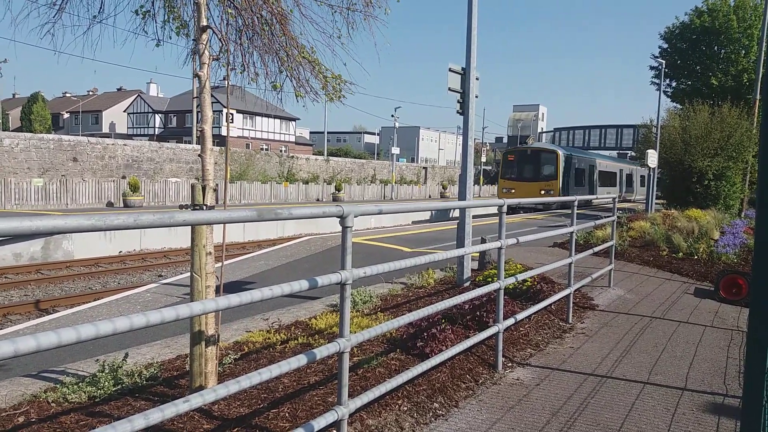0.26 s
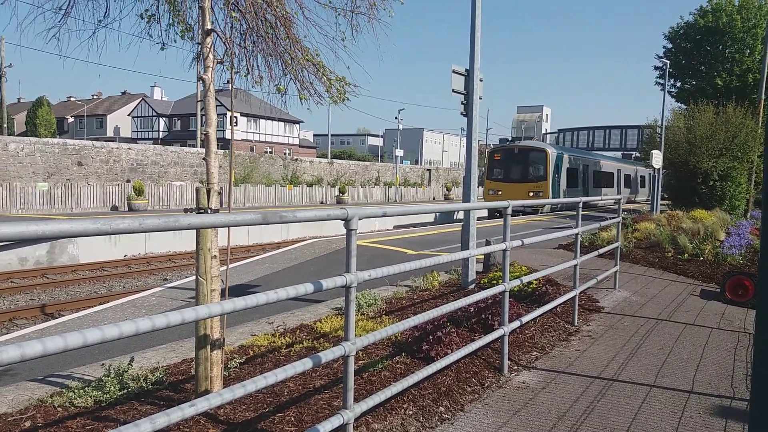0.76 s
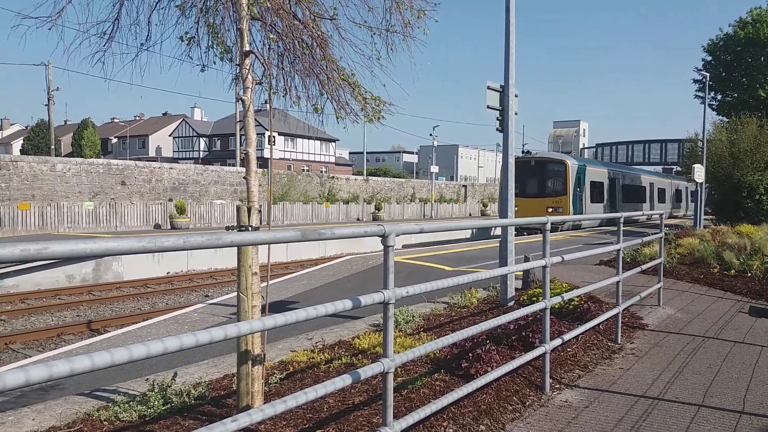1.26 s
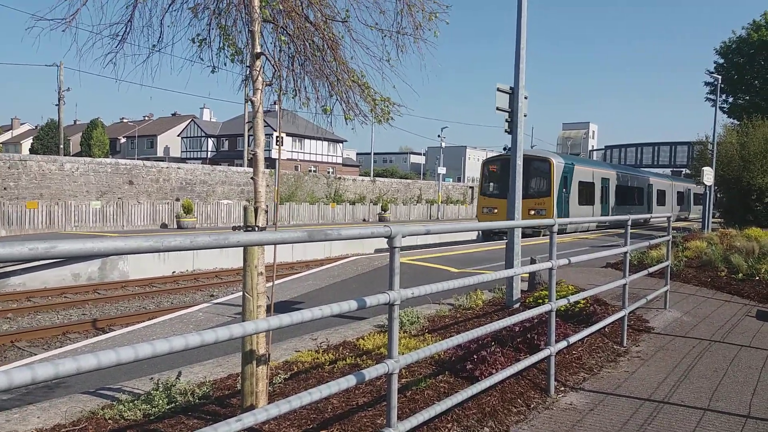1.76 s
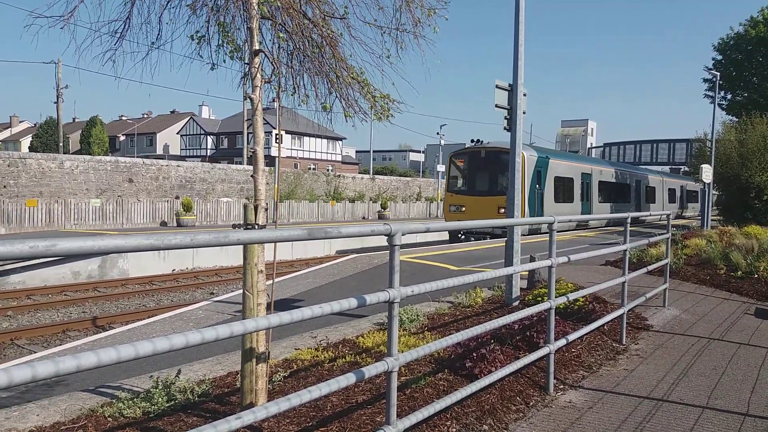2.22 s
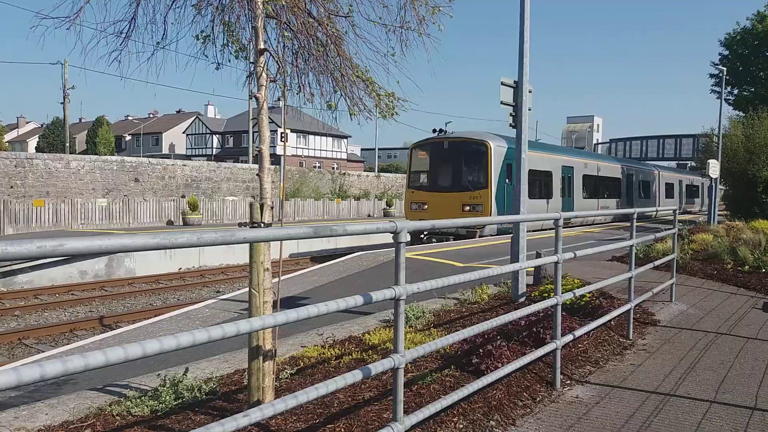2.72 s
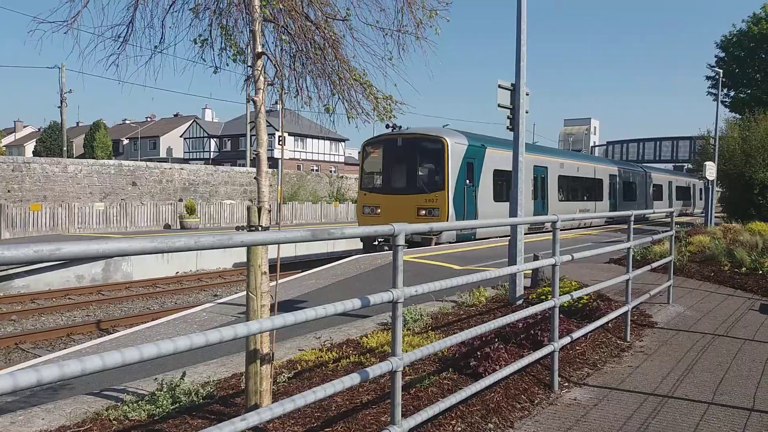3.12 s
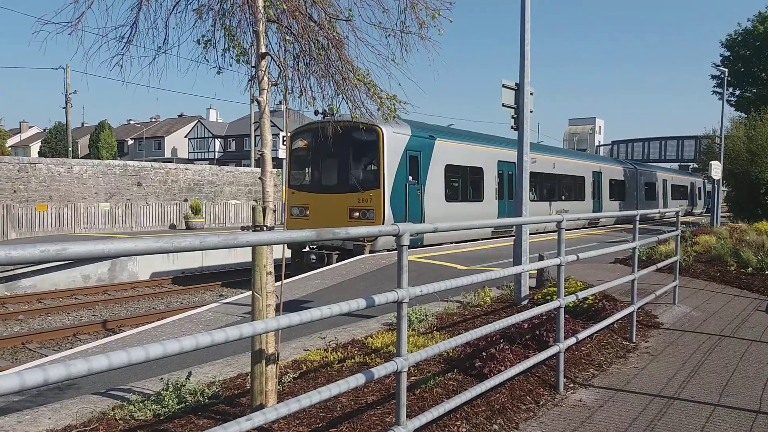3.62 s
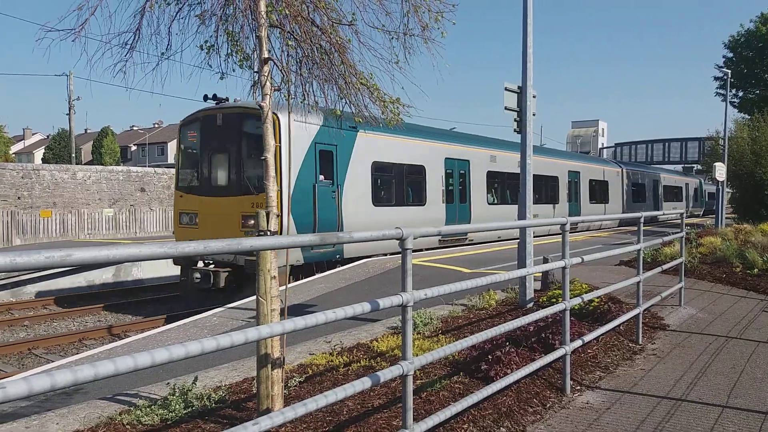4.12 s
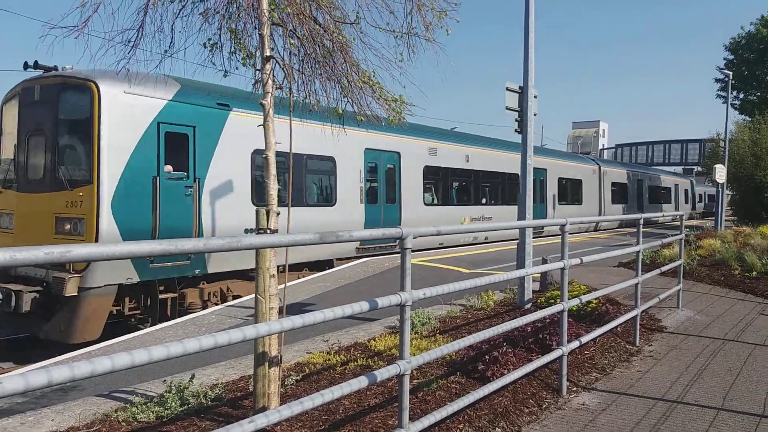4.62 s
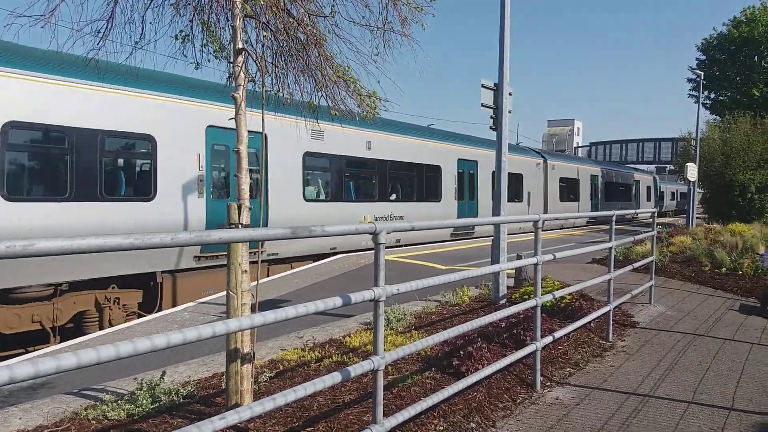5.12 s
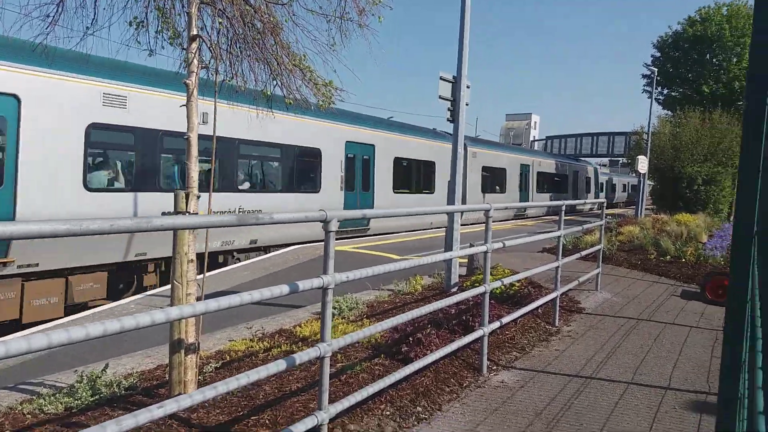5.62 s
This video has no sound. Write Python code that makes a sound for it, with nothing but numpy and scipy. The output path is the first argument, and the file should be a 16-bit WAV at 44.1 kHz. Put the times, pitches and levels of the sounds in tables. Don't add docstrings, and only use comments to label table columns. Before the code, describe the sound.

Low throbbing diesel drone and hiss swell as a railcar rolls close by, with dull rail knocks, a short air burst and singing wheels.

```python
import sys
import numpy as np
from scipy import signal
from scipy.io import wavfile
from scipy.ndimage import uniform_filter1d, map_coordinates

SR = 44100
rng = np.random.default_rng(int(sys.argv[2]) if len(sys.argv) > 2 else 0)


def attenuation_scalar(level_db):
    decades = np.asarray(level_db, float) / 20
    return 10 ** decades


def inscribe(sig):
    pcm = np.round(np.clip(np.atleast_2d(sig).T, -1, 1) * 32767)
    wavfile.write(sys.argv[1], SR, pcm.astype(np.int16))


N = 258867

# t/s, wheel gain/dB, fan gain/dB
APPROACH = [(0.0, 0, 1), (0.4, 0, -.5), (1.4, 1, 1.5), (2.05, 3.5, 0.5), (2.6, 5, 4.5), (3.1, 6.5, 3),
            (3.35, 6, 6.5), (3.7, 8, 6.5), (4.5, 9.5, 6), (4.9, 10, 4), (5.3, 13.5, 6), (5.87, 18, 12)]
# start t/s, length/s, f/Hz, width/Hz, level/dB (rms)
ECHO_BANDS = [(-.3, .9, 4050, 300, -43), (1.2, .65, 4750, 180, -47), (1.0, .7, 3750, 300, -47),
              (2.1, 1.0, 4350, 200, -44), (2.3, 1.2, 3900, 200, -46), (2.95, .8, 1690, 90, -37),
              (3.3, .85, 1600, 250, -36), (3.5, 1.1, 1820, 320, -34), (2.5, .9, 1110, 50, -43),
              (3.6, .5, 1110, 30, -43), (5.7, .33, 1465, 14, -29), (5.5, .25, 1530, 25, -31),
              (5.4, .25, 1635, 15, -33), (5.7, .3, 630, 30, -34), (2.4, 1.4, 8950, 80, -68),
              (3.1, 1.0, 2620, 120, -44), (2.2, .7, 2720, 120, -46), (1.1, .5, 750, 20, -47),
              (1.7, .7, 795, 60, -45), (2.1, .4, 560, 15, -45), (5.55, .32, 815, 90, -36),
              (4.05, .2, 120, 25, -29), (-.1, .45, 150, 70, -36), (5.55, .3, 210, 8, -29)]
# t/s, peak level/dB, f/Hz, time to fall 60 dB/s
JOINT_KNOCKS = [(3.1, -18, 89, 0.12), (2.2, -21, 200, 0.065), (0.708, -20, 300, 0.028),
                (0.4, -20, 180, 0.046), (4.5, -19, 270, 0.024), (3.924, -8.5, 260, 0.018),
                (3.926, -17, 480, .025), (4.166, -11, 210, 0.018), (5.48, -13, 309, 0.042),
                (5.26, -34, 10540, .006), (.2, -52, 10200, .03), (5.336, -47, 9940, .08),
                (5.35, -43, 10140, .08)]
# f/Hz, level/dB per Hz
FAN_HISS_FAR = [(1180, -60), (2000, -8), (2350, 2.5), (2730, -2), (2970, -0.5), (3210, -2), (4080, 1),
                (4890, -8), (5150, -11.5), (6220, -11), (7780, -31), (9000, -28), (11200, -28),
                (13300, -26), (15600, -47)]
FAN_HISS_NEAR = [(1180, -62), (2000, 1), (2380, -11.5), (2570, -6.5), (2920, -9.5), (3840, -6),
                 (4640, -7.5), (5190, -10.5), (6060, -9.5), (6780, -13), (7910, -35), (9320, -24),
                 (12300, -32.5), (13800, -32), (15600, -30)]
# t/s, f/Hz, level/dB (rms)
TURBO_WHISTLE = [(0, 12600, -68), (.7, 12900, -66), (1.5, 12900, -63), (2.5, 13100, -60), (3.5, 13500, -55),
                 (4.5, 13400, -57), (4.9, 13760, -53), (5.3, 13700, -53), (5.87, 14000, -48)]
# f/Hz, level/dB per Hz
VENT_HISS = [(1470, -33), (2500, -21), (2760, -7), (3960, 2), (5590, -6), (6320, -1.5), (7830, -17),
             (10000, -12), (11100, -14.5), (12700, -12), (15600, -25)]
# centre t/s, half length/s, peak level/dB
WHEEL_FLARES = [(4.79, .04, -33), (4.98, .07, -35), (5.11, .05, -28), (5.36, .05, -34), (5.48, .03, -33),
                (5.6, .04, -29), (5.69, .02, -31), (5.75, .025, -25), (5.85, .035, -25)]
# f/Hz, level/dB per Hz
BODY_RUMBLE = [(15, -58), (25, -38), (50, -14), (70, -1), (100, 0.5), (125, -6), (160, -0.5), (210, -3.5),
               (263, -5), (313, -5.5), (377, -18), (600, -22.5), (780, -60), (1320, -120)]
# f/Hz, level/dB per Hz
WHEEL_ROAR_FAR = [(210, -47), (350, -10.5), (431, 6.5), (470, -2), (545, 1), (655, -1), (779, 0),
                  (1000, -3), (1250, -7.5), (1470, -2), (1960, -1.5), (2270, -9), (2800, -19), (3640, -50),
                  (6160, -120)]
WHEEL_ROAR_NEAR = [(210, -44), (350, 12), (382, -12), (531, -1.5), (666, -10.5), (800, -1.5), (944, -4),
                   (1180, -2), (1360, -5.5), (1680, -2), (1800, -8), (2350, -20), (2800, -20), (3640, -56),
                   (6160, -120)]
# f/Hz, width/Hz
RING_MODES = [(1480, 30), (1180, 50), (212, 6)]
# centre t/s, half length/s, peak level/dB
RING_MOMENTS = [
    [(.9, .15, -48), (2.1, .2, -47), (3.8, .4, -44), (5.85, .1, -31)],
    [(2.73, .15, -48), (4.76, .1, -43), (5.6, .15, -32), (5.82, .1, -31)],
    [(4.58, .1, -44), (5.73, .08, -28)],
]
# t/s, shaft speed/turns per s, level/dB of the firing tone (3 per turn)
FRONT_ENGINE = [(0.0, 27.1, -39), (0.22, 27.52, -28.5), (0.44, 27.67, -39), (0.8, 27.86, -28.5),
                (1.2, 28, -28.5), (1.45, 28, -22.5), (2.0, 28.2, -16.5), (2.5, 28.3, -20),
                (3.15, 28.48, -25.5), (3.45, 28.58, -19.5), (3.8, 28.62, -17.5), (4.2, 28.68, -20.5),
                (4.56, 28.86, -28), (4.85, 28.8, -20), (5.02, 28.94, -23.5), (5.25, 28.98, -20),
                (5.6, 28.86, -22.5), (5.87, 29.1, -29.5)]
# multiple of shaft speed, level/dB above the rumble
WEAK_ORDERS = [(4, -12), (4.5, -13), (6.5, -13), (7, -11), (7.5, -14), (10, -17), (10.5, -16), (13.5, -20),
               (15, -21)]
# multiples of shaft speed, then resting level/dB of each above the rumble
CASING_ORDERS = [5, 6, 8, 9, 11, 12]
CASING_REST_DB = [-11.5, -10.5, -12, -14.5, -20, -19.5]
# centre t/s, half length/s, peak level/dB
CASING_SWELLS = [
    [(.8, 0.57, -35), (2.8, 0.43, -30), (3.7, .5, -36), (4.65, .15, -36), (5.45, .15, -37)],
    [(.75, 0.42, -33.5), (1.2, 0.1, -33.5), (1.76, 0.25, -25.5), (2.2, .15, -32.5), (2.78, 0.15, -26),
     (3.05, 0.17, -27), (4.45, 0.089, -34), (4.85, .12, -30.5), (5.15, 0.14, -27), (5.58, .12, -28)],
    [(2.4, 0.28, -39), (3.5, 0.19, -44), (5.05, .15, -38), (5.56, 0.16, -33)],
    [(1.15, 0.22, -40), (2.9, 0.33, -42.5), (4.5, 0.0932, -39.5), (5.8, 0.18, -36.5)],
    [(.7, 0.18, -44), (2.0, 0.4, -44.5), (3.3, 0.28, -43), (3.8, .12, -38), (4.12, 0.064, -34.5),
     (5.54, 0.075, -44)],
    [(2.5, 0.26, -44.5), (4.15, .12, -44), (4.75, 0.12, -37.5), (5.1, 0.12, -30.5)],
]
# centre t/s, half length/s, peak level/dB
REAR_SWELLS = [
    [(.17, 0.18, -29.5), (.8, 0.095, -35), (4.0, 0.18, -33)],
    [(.6, .15, -35), (3.0, .2, -41), (4.0, 0.25, -40)],
    [(.2, 0.13, -36.5), (.6, .1, -39), (4.6, .3, -39), (5.3, 0.18, -29)],
]

FAR_RUMBLE_DB, FAR_ROAR_DB, FAR_HISS_DB = -35.5, -37, -38


def at_times(rows):
    s, *columns = np.transpose(rows)
    return [np.interp(np.arange(N) / SR, s, c) for c in columns]


def evened(x):
    return x / np.sqrt(np.mean(x ** 2) + 1e-20)


def wander(per_s):
    knots = rng.standard_normal(400)
    coarse = np.arange(0, N + 64, 64)
    smooth = map_coordinates(knots, [coarse / SR * per_s + 5], order=3)
    return evened(np.interp(np.arange(N), coarse, smooth))


def swells(rest_db, rows):
    t = np.arange(0, N + 64, 64) / SR
    bells = sum(attenuation_scalar(db) * np.exp(-((t - s) / half) ** 2) for s, half, db in rows)
    return 20 * np.log10(attenuation_scalar(rest_db) + np.interp(np.arange(N) / SR, t, bells))


def colour_db(rows, hz):
    table_hz, db = np.transpose(rows)
    return np.interp(np.log(hz + 1), np.log(table_hz), db)


def noise(far, near, share, patchy_db, flicker_db, size=1024):
    hop = size // 4
    frames, hz = N // hop + 5, np.fft.rfftfreq(size, 1 / SR)
    a, b, patches = rng.standard_normal((frames, len(hz), 3)).T
    patches = uniform_filter1d(patches, size=8, axis=0)
    patches = evened(uniform_filter1d(patches, size=40, axis=1))
    flicker = evened(uniform_filter1d(rng.standard_normal(frames), size=4))
    mix = np.clip(share[np.minimum(np.arange(frames) * hop, N - 1)], 0, 1)
    colour = attenuation_scalar(np.outer(colour_db(far, hz), 1 - mix) + np.outer(colour_db(near, hz), mix))
    colour /= np.sqrt((colour ** 2).mean(0))
    z = (a + 1j * b) * colour * attenuation_scalar(patchy_db * patches + flicker_db * flicker)
    return evened(signal.istft(z, nperseg=size, noverlap=size - hop)[1][:N])


def resonate(x, hz, width):
    turn = np.exp(2j * np.pi * np.cumsum(hz * np.ones(len(x))) / SR)
    r = np.exp(-np.pi * width / SR)
    smooth = signal.lfilter([1], np.poly([r, r]), x / turn)
    return evened((turn * smooth).real)


def ringing_noise(hz, width):
    return resonate(rng.standard_normal(N), hz, width)


def echoes():
    out = np.zeros(N + 2 * SR)
    for s, length, hz, width, db in ECHO_BANDS:
        size = round(length * SR)
        band = resonate(rng.standard_normal(size), hz, width)
        out[round((s + 1) * SR):][:size] += attenuation_scalar(db) * band * signal.windows.tukey(size, .75)
    return out[SR:SR + N]


def knocks():
    out, t = np.zeros(N + 8000), np.arange(8000) / SR
    for s, db, hz, t60 in JOINT_KNOCKS:
        out[round(s * SR):][:len(t)] -= attenuation_scalar(db - 60 * t / t60) * np.sin(2 * np.pi * hz * t)
    return out[:N]


def valve():
    rise_s, hold_s, fall_s = .11, .13, .11
    t = np.arange(N) / SR - 4.53
    left = rise_s + hold_s + fall_s - t
    opening = np.clip(np.minimum(t / rise_s, left / fall_s), 0, 1)
    db = -28.5 - 24 * (1 - opening) ** 2 - 21 * (t - rise_s)
    return (opening > 0) * attenuation_scalar(db) * noise(VENT_HISS, VENT_HISS, t, 0.94, 0.69)


def turbocharger():
    hz, db = at_times(TURBO_WHISTLE)
    return attenuation_scalar(db) * (0.8 * ringing_noise(hz, 450) + 0.61 * ringing_noise(hz - 300, 2500))


def fans(facing_db, near_db, turns):
    share = 0.27 + .035 * near_db
    firing = .04 * np.cos(2 * np.pi * 3 * turns)
    shaft = .05 * np.cos(2 * np.pi * 2 * turns)
    hiss = attenuation_scalar(FAR_HISS_DB + facing_db) * noise(FAN_HISS_FAR, FAN_HISS_NEAR, share, 0.78, 0.37)
    return (1 + firing + shaft) * (hiss + turbocharger())


def singing_wheel():
    t = np.maximum(np.arange(N) / SR - 4.74, -.1)
    hz = 1709 - 10.0 * t
    db = swells(-39 + 4.0 * t, WHEEL_FLARES)
    tone = np.sqrt(2) * np.sin(2 * np.pi * np.cumsum(hz) / SR + .5 * wander(18.0))
    fade_in = np.clip(t * 10 + 1, 0, 1)
    return fade_in * attenuation_scalar(db) * (.92 * tone + .4 * ringing_noise(hz, 45))


def rings(near_db):
    out = np.zeros(N)
    for (hz, width), far_db, rows in zip(RING_MODES, [-53, -58, -54], RING_MOMENTS):
        rest_db = far_db + .7 * near_db + 3.0 * wander(3.988)
        out += attenuation_scalar(swells(rest_db, rows)) * ringing_noise(hz, width)
    return out


def wheels(rumble_db, near_db):
    rumble = attenuation_scalar(rumble_db + 1.2) * noise(BODY_RUMBLE, BODY_RUMBLE, np.zeros(N), 2.5, 1.0, size=4096)
    share = np.full(N, .49)
    roar = noise(WHEEL_ROAR_FAR, WHEEL_ROAR_NEAR, share, 1.3, .2, size=2048)
    return rumble + attenuation_scalar(FAR_ROAR_DB + near_db) * roar + rings(near_db)


def orders(turns, multiples, levels_db, waver):
    out = np.zeros(N)
    for k, db in zip(multiples, levels_db):
        phase = 2 * np.pi * (k * turns + rng.random()) + waver * k * wander(6.0)
        out += np.sqrt(2) * attenuation_scalar(db) * np.sin(phase)
    return out


def front_engine(rumble_db, speed_turns, firing_db):
    nearing_db = np.linspace(-1.5, 3.5, N)
    weak_db = [rumble_db + db + nearing_db + 2.97 * wander(2.49) for _, db in WEAK_ORDERS]
    casing_db = [swells(rumble_db + db, rows) + 1.23 * wander(7.0)
                 for db, rows in zip(CASING_REST_DB, CASING_SWELLS)]
    firing_db = firing_db + .4 * wander(9.0)
    strong = orders(speed_turns, [3] + list(CASING_ORDERS), [firing_db] + casing_db, .025)
    weak = orders(speed_turns, [k for k, _ in WEAK_ORDERS], weak_db, .03)
    return strong + weak


def rear_engine():
    top_hz, lag_hz, rise_s = 26.75, 1.8, .6
    speed = top_hz - lag_hz * np.exp(-np.arange(N) / SR / rise_s)
    levels_db = [swells(-50, rows) for rows in REAR_SWELLS]
    return orders(np.cumsum(speed) / SR, [3, 5, 6], levels_db, .06)


def scene():
    near_db, facing_db = at_times(APPROACH)
    rumble_db = FAR_RUMBLE_DB + 0.4 * near_db
    speed, firing_db = at_times(FRONT_ENGINE)
    turns = np.cumsum(speed) / SR
    background = echoes() + knocks() + valve() + fans(facing_db, near_db, turns)
    rolling = singing_wheel() + wheels(rumble_db, near_db)
    drone = front_engine(rumble_db, turns, firing_db) + rear_engine()
    return (background + rolling + drone)[None]


def roll_off(x):
    return signal.sosfilt(signal.butter(12, 15760, fs=SR, output="sos"), x)


def record(dry):
    bass_cut = signal.butter(3, 55, "highpass", fs=SR, output="sos")
    thin = signal.sosfilt(bass_cut, dry)
    return roll_off(thin)


dry = scene()
out = record(dry)
inscribe(out)
```